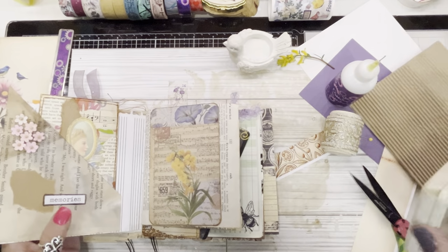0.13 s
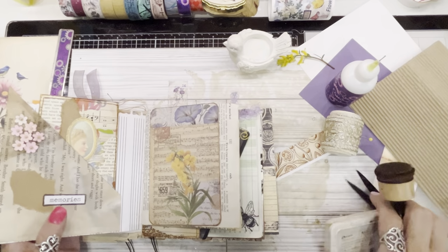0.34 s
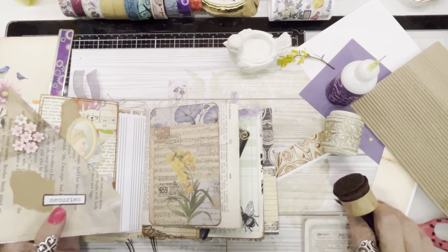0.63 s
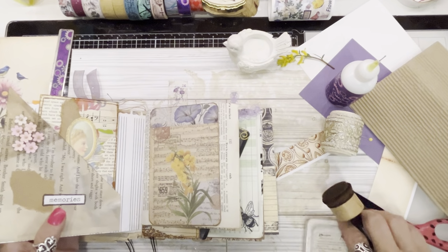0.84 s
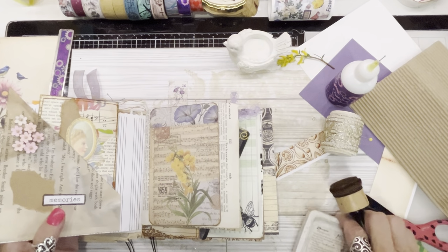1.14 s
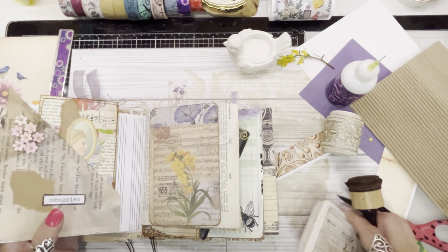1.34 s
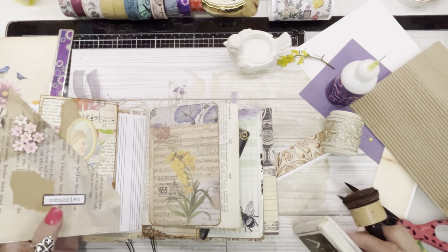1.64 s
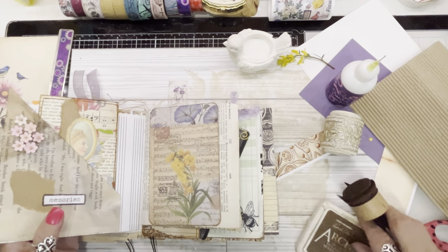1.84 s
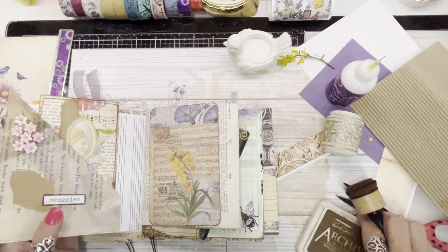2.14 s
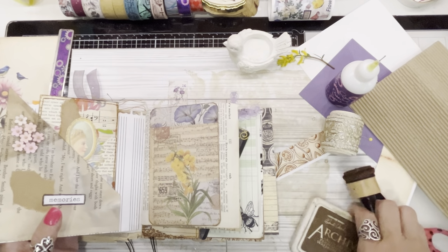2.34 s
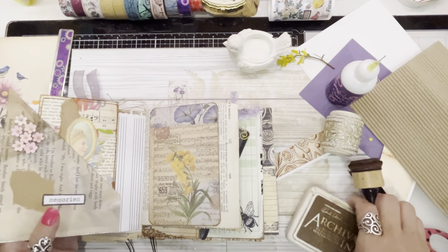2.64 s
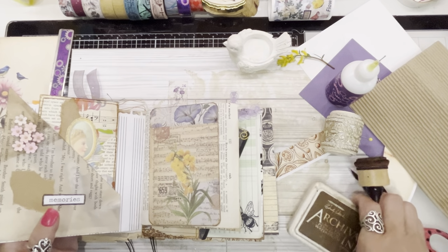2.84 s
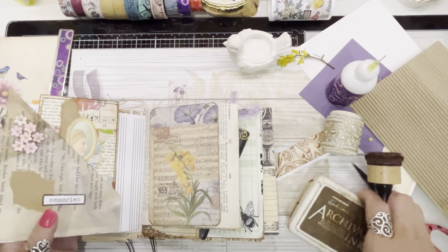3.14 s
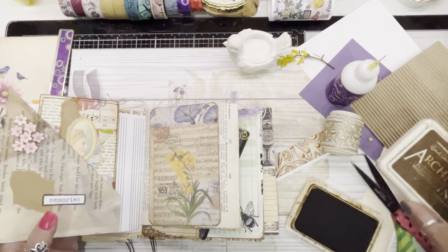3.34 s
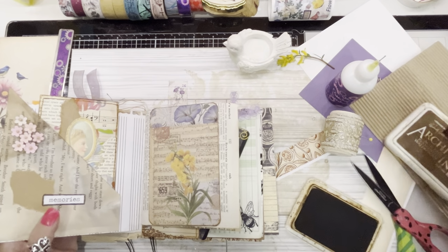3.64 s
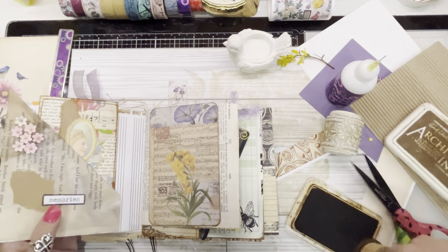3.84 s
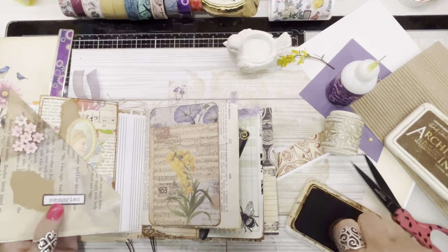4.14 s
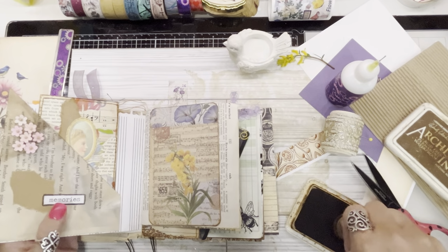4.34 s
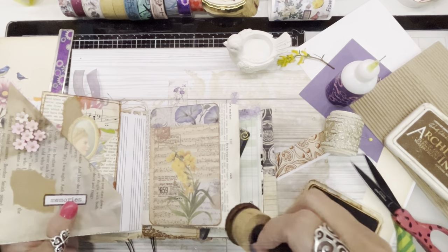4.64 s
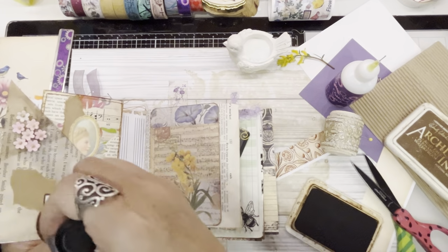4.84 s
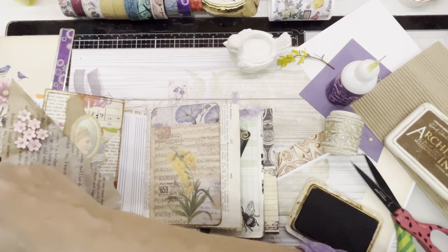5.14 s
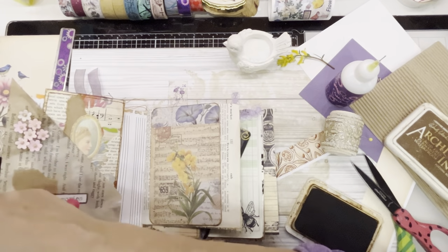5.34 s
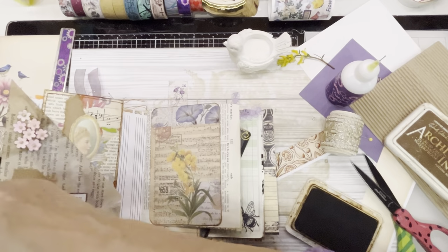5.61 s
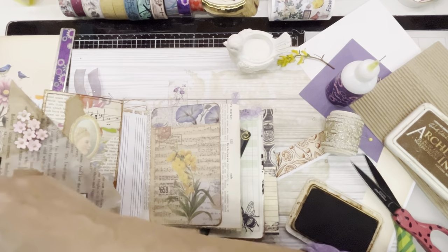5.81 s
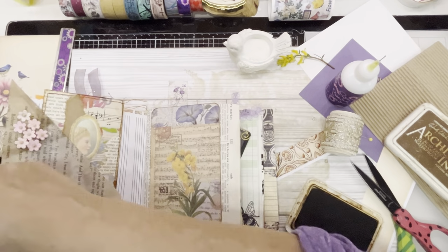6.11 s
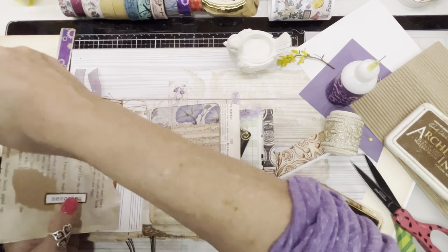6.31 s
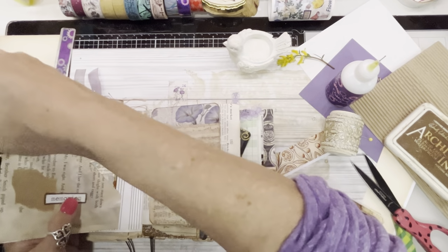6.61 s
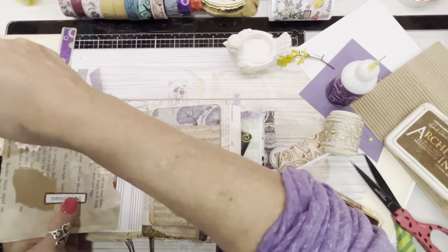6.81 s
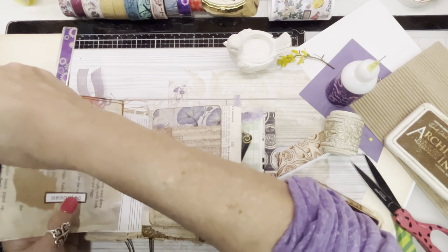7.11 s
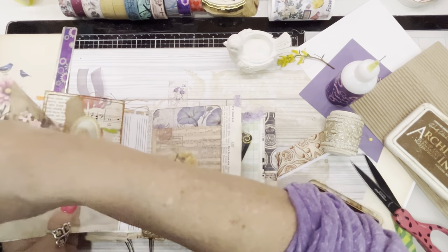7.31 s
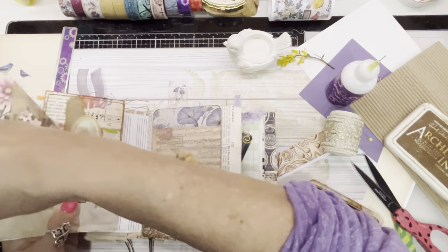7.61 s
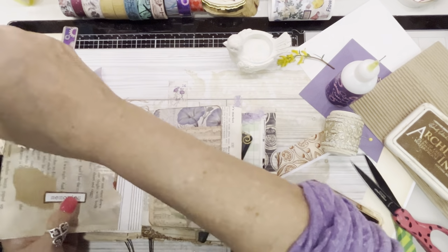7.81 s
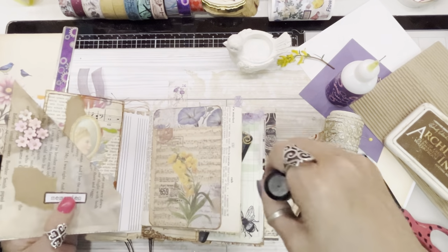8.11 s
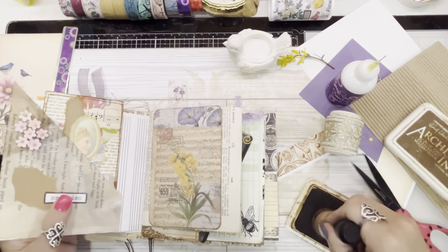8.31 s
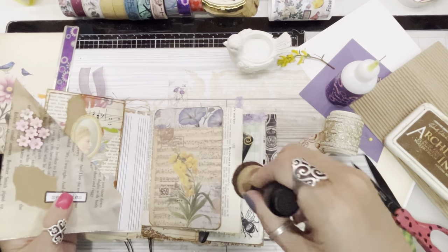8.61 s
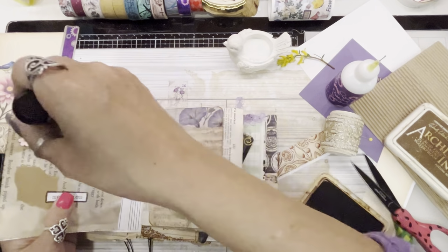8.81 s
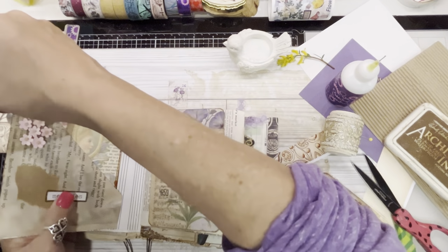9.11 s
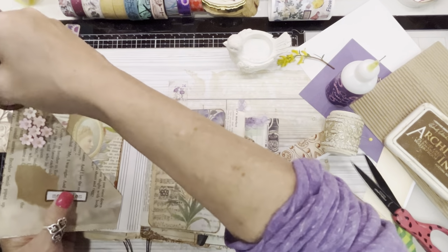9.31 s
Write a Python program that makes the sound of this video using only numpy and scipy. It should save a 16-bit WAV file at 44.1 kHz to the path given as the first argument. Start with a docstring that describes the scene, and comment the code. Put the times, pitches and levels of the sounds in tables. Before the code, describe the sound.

A plastic ink-pad case clatters on a craft desk, its lid scrapes off, then a foam tool rubs paper in short raspy strokes.

```python
"""A small room hums low throughout. First a plastic ink-pad case knocks and slides on a craft desk:
each blow is a noise burst ringing the shell and the desk, each slide is filtered hiss.
Then its lid is drawn off, a juddering scrape that sinks in pitch, and is put down with more knocks.
A foam tool is dabbed on the pad and rubbed in short hissing, rasping strokes along a sheet's edge;
it is dabbed again, squeaks as it twists off the pad, and rubs once more. A close pair of microphones."""
import sys
import numpy as np
from scipy import signal
from scipy.fft import rfft, irfft
from scipy.io import wavfile
from scipy.ndimage import map_coordinates

SR = 44100
rng = np.random.default_rng(int(sys.argv[2]) if len(sys.argv) > 2 else 0)


def put_to_file(sound):
    """Save the sound as 16-bit audio at rate SR, in the file named by the first command-line argument."""
    columns = np.atleast_2d(sound).T  # one column per channel
    safe = np.clip(columns, -1, 1)
    whole_steps = np.round(safe * 32767)
    wavfile.write(sys.argv[1], SR, whole_steps.astype(np.int16))


N = 416914
TIME = np.arange(N) / SR
BLOW = TIME[:SR // 3]   # the time that one blow lasts
HZ = np.maximum(np.arange(N // 2 + 1) * SR / N, 1)

# In all tables, levels in dB are relative: later gains set the mix. t60_s is the time to fade by 60 dB.
# the case knocking on the desk: start_s, strength_db, flatness [0 on an edge to 1 on its face],
# hardness [0-1], pitch_hz [of the low ring], desk_thud_db [extra]
KNOCKS = [(0.3024, -20.5, 0.61, 0.7, 680, -2.5), (0.331, -32, 0.64, 0, 600, -2.5),
          (0.3514, -30, 0.85, 0.7, 624, 3.5), (0.364, -22, 0.24, .6, 677, -6),
          (0.4082, -37.5, 0.29, 0, 623, 2.5), (0.4762, -13.5, 0.56, 1, 635, -2),
          (0.4924, -14, 0.6, 0.95, 592, 0), (0.508, -32, 0.53, 0.6, 650, 0),
          (0.5861, -23.5, 0.29, 0.35, 660, 4), (.599, -31, 0.88, 0, 765, -2), (.606, -30.5, 1, 0, 770, 2),
          (0.671, -43.5, 0.68, 1, 634, 2.5), (0.705, -41, 0.72, 0.72, 645, 4.5),
          (0.8786, -31, 0.54, 0.68, 690, 5), (0.8849, -21, 0.27, 0.4, 713, -3),
          (0.935, -43, 0.47, 0.1, 654, 7), (1.0056, -25, 0.26, 0.74, 700, 0.5),
          (1.018, -24, 0.41, 0.42, 678, 0), (1.032, -27.5, 0.37, 0.04, 644, 0),
          (1.0649, -30, 0.37, 0, 655, 2), (1.093, -38, 0.56, 0.08, 645, 6.5),
          (1.4484, -26.5, 0.77, 0.2, 580, -2.5), (1.4638, -35.5, 0.71, 0.2, 472, -3),
          (1.5514, -18.5, 0.82, 0.95, 654, -2), (1.5604, -27.5, .95, 0.6, 647, -6),
          (1.5887, -22.5, 0.79, 0.54, 627, 4), (1.596, -26, 0.95, 0, 443, 4),
          (1.608, -19.5, 0.79, 0.5, 582, 4), (1.6143, -23.5, 0.78, 0, 594, 3),
          (1.6534, -35.5, 1, 1, 636, -0.5), (1.7117, -32, 0.63, 0, 652, 1),
          (1.7895, -35.5, 0.41, .55, 600, 5), (1.8, -31.5, 0.27, 0.9, 610, -1.5),
          (1.8088, -12.5, 0.38, 0.84, 690, -1.5), (1.835, -27, 0.081, 0.84, 645, 2.5),
          (1.871, -17.5, 0.56, 0.94, 608, 0), (1.9817, -46, 0.46, 0.97, 606, 2),
          (2.1076, -38.5, 0.88, 1, 656, 7), (2.135, -42.5, 0.8, 1, 650, 4.5),
          (2.2153, -32, 0.28, 0.27, 670, -4), (2.2688, -22, 0.18, 0.21, 655, 0.5),
          (2.377, -43.5, 0.73, 0.6, 646, 4), (2.392, -46.5, 0.58, 0.1, 617, -1),
          (2.57, -43.5, 0.67, 0.1, 633, -7), (2.993, -43.5, 0.44, 0.2, 604, -3),
          (3.0909, -43, 0.55, 0, 707, -1.5)]
# low ring of the case lying on the desk: multiple_of_pitch, level_db, t60_s
RING = [(.47, -11, 0.015), (.7, -5, 0.031), (.9, -9.5, 0.033), (.99, 6.5, 0.044), (1.069, -5, 0.052),
        (1.189, -8, .05)]
# resonances of the plastic shell: pitch_hz, width_hz, level_db
SHELL = [(655, 20, 13), (860, 360, 2), (1016, 49, 6.5), (1267, 130, 1), (1800, 150, -11.5), (1840, 53, -11),
         (2497, 190, -2.5), (2930, 65, -4.5), (3030, 130, -6.5), (3337, 150, -6.5), (3660, 65, -6),
         (4040, 160, -7), (4460, 160, -3), (5160, 200, 3.5)]
# resonances of the hollow lid: pitch_hz, width_hz, level_db
LID_MODES = [(633, 52, 2), (1350, 135, 5), (1854, 45, -8.5), (2440, 57, -4.5), (2730, 120, -8.5),
             (3580, 160, 0), (3735, 130, 2), (4460, 120, -11), (5450, 170, -2), (7900, 100, -5)]
# colour of the case scraping the desk: pitch_hz, level_db [per Hz]
SLIDE_COLOUR = [(200, -5.5), (400, -9.5), (650, -2.5), (1000, -5.5), (1500, -8), (2800, -7.5), (3900, -4.5),
                (5500, -6.5), (7500, -14.5), (10000, -27.5), (15500, -28)]


def from_db(db):
    """Turns decibels into a gain."""
    return 10 ** (np.asarray(db) / 20)


def rms_one(x):
    """Scales a sound to an average strength (rms) of 1."""
    return x / np.sqrt(np.mean(x ** 2) + 1e-20)


def over_hz(points):
    """Reads a table of (Hz, value) at every frequency, in even steps of pitch."""
    hz, value = np.transpose(points)
    return np.interp(np.log(HZ), np.log(np.maximum(hz, 1)), value)


def level(rows):
    """Turns a table of (s, dB) into a gain in time, silent outside it."""
    s, db = np.transpose(rows)
    return from_db(np.interp(TIME, s, db, left=-200, right=-200))


def band(x, low_hz, high_hz, order=2):
    """Keeps only the frequencies between two limits."""
    limits = [low_hz, min(high_hz, .45 * SR)]
    return signal.sosfilt(signal.butter(order, limits, "band", fs=SR, output="sos"), x + 1e-18)


def coloured(x, spectrum):
    """Shapes the spectrum by a table of (Hz, dB); rms 1."""
    return rms_one(irfft(rfft(x) * from_db(over_hz(spectrum)), N))


def drift(rate_hz):
    """Slow random wandering, rms 1: low-passed noise on a coarse grid."""
    coarse = np.arange(0, N + 32, 32)
    hz = np.fft.rfftfreq(len(coarse), coarse[1] / SR)
    spectrum = rfft(rng.standard_normal(len(coarse))) / (1 + (hz / rate_hz) ** 4)
    slow = irfft(spectrum, len(coarse))
    return np.interp(np.arange(N), coarse, rms_one(slow))


def resonate(x, modes):
    """Rings side-by-side resonances of (Hz, width Hz, dB), with alternating signs."""
    out = 0
    for k, (hz, width, db) in enumerate(modes):
        r = np.exp(-np.pi * width / SR)
        feed = np.array([1, 0, -1]) * (1 - r * r) / 2
        feedback = [1, -2 * r * np.cos(2 * np.pi * hz / SR), r * r]
        out = out + (-1) ** k * from_db(db) * signal.lfilter(feed, feedback, x)
    return out


def width_from_t60(t60):
    """A resonance that fades slowly is narrow: its width in Hz."""
    return np.log(1000) / np.pi / t60


def dying(t60, rise_s, delay_s=0):
    """Envelope of one blow: a quick rise, then an exponential fade."""
    t = np.maximum(BLOW - delay_s, 0)
    return (1 - np.exp(-t / rise_s)) * np.exp(-np.log(1000) * t / t60)


def at_level(x, db):
    """Scales a blow so that its energy, spread over 10 ms, has this level."""
    energy = np.sum(x ** 2, axis=-1, keepdims=True)
    return from_db(db) * x / np.sqrt(energy / (SR / 100) + 1e-20)


def place_blow(out, blow, s):
    """Adds one blow to the track at its start time."""
    start = int(s * SR)
    out[:, start:start + len(BLOW)] += blow


def gestures(rows, attack_s, release_s):
    """Gain of hand movements: each speeds up, swells or sags steadily, and slows to a stop."""
    out = np.zeros(N)
    for s, length, db, swell_db in rows:
        t = np.clip(TIME - s, 0, length)
        speed = np.minimum(t / attack_s, 1) * np.minimum((length - t) / release_s, 1)
        out += speed * from_db(db + swell_db * (t / length - .5))
    return np.maximum(out, 0)


def friction(grains_per_s, grain_share, flutter_db, flutter_hz):
    """Countless tiny slips: a smooth hiss with coarser grains, fluttering with the pressure of the hand."""
    slips = (rng.random((2, N)) < grains_per_s / SR) * rng.standard_normal((2, N))
    rub = rng.standard_normal((2, N)) + grain_share * rms_one(slips)
    return rub * from_db(flutter_db * drift(flutter_hz))


def stick_slip(per_s, uneven, hold, spread_db):
    """Gain of a rub that goes in uneven jerks, each dying before the next; rms 1."""
    phase = np.cumsum(per_s * np.exp(uneven * drift(per_s))) / SR
    return rms_one(np.exp(-(phase % 1) / hold) * from_db(spread_db * drift(per_s)))


def snags(per_s, spread_db):
    """Now and then a fibre catches and lets go: lone clicks of very uneven size; rms 1."""
    sizes = from_db(spread_db * np.minimum(rng.exponential(1, N), 3))
    return rms_one((rng.random(N) < per_s / SR) * sizes * rng.standard_normal((2, N)))


def gliding(hz, width_hz):
    """Noise in one resonance whose centre moves."""
    phase = 2 * np.pi * np.cumsum(hz) / SR
    return (drift(width_hz) * np.sin(phase) + drift(width_hz) * np.cos(phase)) * [[1], [0]]


def wandering(x, share, rate_hz):
    """The hand flexes the object, so all its resonances waver together: playback speed varies."""
    place = np.cumsum(1 + share * drift(rate_hz))
    return np.array([map_coordinates(row, [place], order=3, mode="nearest") for row in x])


def shifting(x, patchy_db, rate_hz):
    """The contact moves over the surface, so each octave swells and fades on its own; rms 1."""
    edges = 450 * 2 ** np.arange(7)
    octaves = zip(edges, edges[1:])
    return rms_one(sum(band(x, low, high) * from_db(patchy_db * drift(rate_hz)) for low, high in octaves))


def case_sings(x):
    """Steady rubbing keeps the low ring of the case going; rms 1."""
    resting_hz = 660
    return rms_one(resonate(x, [(resting_hz * ratio, width_from_t60(t60), db) for ratio, db, t60 in RING]))


def chatter(t60, rattles_per_s, rattle_db, rattle_t60, rise_s):
    """One contact: a short crunch, then smaller and smaller touches as the object settles."""
    touches = (rng.random(len(BLOW)) < rattles_per_s / SR) * rng.random(len(BLOW))
    touches = touches * dying(rattle_t60, 0.0049)
    settling = signal.fftconvolve(touches, dying(t60 / 2, rise_s))[:len(BLOW)]
    return rng.standard_normal((2, len(BLOW))) * (dying(t60, rise_s) + from_db(rattle_db) * settling)


def contact_rules(strength_db, flatness, hardness):
    """A flat landing rings, an edge clacks, a hard contact ticks: ring dB, clack Hz, clack dB, tick dB."""
    flat_swing_db = 46   # from edge to face, the low ring gains this much on the clack
    soft_tick_db = -44   # the softest contact loses this much of the tick
    ring_over_clack = flat_swing_db * (flatness - .5)
    ring_db = strength_db + min(ring_over_clack, 0)
    clack_db = strength_db - max(ring_over_clack, 0)
    # hardness raises the centre of the clack, flatness lowers it (in octaves)
    clack_hz = 1900 * 2 ** (0.93 * hardness - 1.1 * flatness)
    return ring_db, clack_hz, clack_db, clack_db + soft_tick_db * (1 - hardness)


def rim_tick(t60):
    """The rim crunches briefly and brightly."""
    # bright tick of the rim: pitch_hz, width_hz, level_db
    tick_modes = [(5150, 1300, 10.5), (6100, 350, 1), (6760, 450, 4), (7920, 430, -15.5),
                  (10860, 2700, -6.5), (11870, 2800, -6.5), (14500, 710, -12)]
    touch = chatter(t60, rattles_per_s=90, rattle_db=-14.5, rattle_t60=0.092, rise_s=0.00048)
    return resonate(touch, tick_modes)


def desk_thud(desk_top_hz, travel_s, desk_damping):
    """The desk top booms after the blow: bending waves arrive late, the lowest last."""
    # desk top: pitch_hz, level_db, t60_s [before desk_damping divides it]
    desk_modes = [(51.5, -9, 0.05), (73.3, 2, 0.32), (96, 5, 0.23), (163.6, 1, 0.22), (200, 3.5, 0.17),
                  (270, 2.5, 0.09), (383, 1.5, 0.039)]
    boom = 0
    for hz, db, t60 in desk_modes:
        late = travel_s * np.sqrt(desk_modes[0][0] / hz)
        strength = from_db(db + rng.normal(0, 0.86)) / (1 + (hz / desk_top_hz) ** 4)
        wave = np.sin(2 * np.pi * hz * (1 + rng.normal(0, 0.054)) * (BLOW - late))
        boom = boom + strength * dying(t60 / desk_damping, 0.0087, late) * wave
    return band(boom, 45, 980)


def blows(table, shell_modes, puff_db, ring_db, clack_db, tick_db, thud_db, thud_follows, ring_rise_s,
          clack_t60, tick_t60, clack_width, desk_top_hz, travel_s, crack, desk_damping):
    """Each contact gives a tick, a clack of the shell, a low ring, a dull puff and a late thud of the desk."""
    mode_scatter_db = 3
    out = np.zeros((2, N + len(BLOW)))
    for s, strength_db, flatness, hardness, pitch, weight_db in table:
        ring, centre, clack, tick = contact_rules(strength_db, flatness, hardness)
        blow = at_level(rim_tick(tick_t60), tick + tick_db)
        contact = chatter(clack_t60, rattles_per_s=530, rattle_db=-12.5, rattle_t60=0.095, rise_s=0.00046)
        # the place of contact and the grip change how each mode answers
        modes = [(hz * (1 + rng.normal(0, 0.005)), width, db + rng.normal(0, mode_scatter_db))
                 for hz, width, db in shell_modes]
        rung = resonate(contact, modes) + crack * contact
        shell = band(rung, centre / clack_width, centre * clack_width)
        blow += at_level(shell, clack + clack_db)
        low = 0
        for ratio, db, t60 in RING:
            tone = np.sin(2 * np.pi * pitch * ratio * (BLOW - .002))
            low = low + from_db(db + rng.normal(0, 0.88)) * dying(t60, ring_rise_s) * tone
        blow[0] += at_level(low, ring + ring_db)
        # air and loose paper are squeezed under the blow
        puff = band(rng.standard_normal(len(BLOW)) * dying(t60=0.089, rise_s=0.0034), 205, 860)
        blow[0] += at_level(puff, (strength_db + ring) / 2 + puff_db)
        thud = desk_thud(desk_top_hz, travel_s, desk_damping)
        blow[0] += at_level(thud, thud_db + weight_db + thud_follows * strength_db)
        place_blow(out, blow, s)
    return out[:, :N]


def room_tone():
    """Moving air as coloured noise, and the hum of appliances as wavering tones."""
    # room air: pitch_hz, level_db [per Hz]
    air_colour = [(20, -23.5), (35, -20.5), (55, -1.5), (90, -0.5), (145, -12), (260, -18.5), (450, -15.5),
                  (700, -22), (1500, -26), (4000, -32), (5500, -37), (8000, -50), (12000, -57),
                  (16000, -54)]
    # hum: pitch_hz, level_db, wavering_share [0-1]
    hum_tones = [(70, -57, 0.99), (101.6, -64, 1), (117.5, -54, .92), (163.5, -73.5, 1), (349, -74, 1)]
    air = from_db(-58.5) * coloured(rng.standard_normal((2, N)), air_colour)
    for hz, db, waver in hum_tones:
        phase = 2 * np.pi * hz * TIME
        steady = np.sqrt(2 * (1 - waver ** 2))
        in_step = (steady + waver * drift(rate_hz=5.3)) * np.sin(phase)
        air[0] += from_db(db - 3.0) * (in_step + waver * drift(rate_hz=2.5) * np.cos(phase))
    return air


def room(x, wet_db, treble_t60):
    """The walls' echoes blur into a diffuse tail of fading noise, its treble dying sooner."""
    room_t60_s = 0.26
    t = TIME[:SR // 2]
    noise = rng.standard_normal((2, len(t))) * (1 - np.exp(-t / 0.0022))
    tail = band(noise, 140, 3600) * from_db(-60 * t / room_t60_s)
    tail += 0.6 * band(noise[::-1], 4200, 13000) * from_db(-60 * t / treble_t60)
    tail /= np.sqrt(np.sum(tail ** 2) / 2)
    return from_db(wet_db) * signal.fftconvolve(x, tail, axes=1)[:, :N]


def microphones(x, likeness):
    """The first row is what both microphones share, the second what sets them apart."""
    # how far the left leads: pitch_hz, lead_radians
    lead = [(100, 0), (450, -.8), (900, -2), (1700, .4), (2600, -2.3), (3700, -.9), (4900, -3.1),
            (6100, -2.9), (7600, -.3), (8800, 1.5), (10000, 3.1), (12500, 6.3), (15000, 9.4)]
    # left louder than right: pitch_hz, difference_db
    tilt = [(60, 0), (120, 2), (240, 1.5), (480, 2.5), (950, 4), (1890, 0), (3770, -1.5), (7520, 0.5),
            (15000, -0.5)]
    alike = over_hz(likeness)
    shared, apart = rfft(x)
    sides = np.array([[1], [-1]])
    pair = (np.sqrt(1 + alike) * shared + sides * np.sqrt(1 - alike) * apart) / np.sqrt(2)
    pair = pair * from_db(sides * over_hz(tilt) / 2) * np.exp(.5j * sides * over_hz(lead))
    return irfft(pair, N)


def tool_taps():
    """Small ticks of the tool in the hand: short crunches ring it."""
    # ticks: start_s, level_db
    taps = [(5.445, -67), (6.199, -55), (7.267, -58), (7.5375, -61), (7.575, -54), (8.865, -53.5)]
    # resonances of the tool: pitch_hz, width_hz, level_db
    tool_modes = [(1420, 280, -15), (2140, 340, 9), (3200, 390, 3.5)]
    out = np.zeros((2, N + len(BLOW)))
    for s, db in taps:
        crunch = rng.standard_normal((2, len(BLOW))) * dying(0.022, 0.0003)
        place_blow(out, at_level(resonate(crunch, tool_modes), db), s)
    return out[:, :N]


def clicks():
    """Loose lid and base click together in handling: a short crunch rings one spot of the rim."""
    # clicks: start_s, level_db, pitch_hz, t60_s
    click_rows = [(0.3128, -35.5, 5330, .02), (0.349, -45, 5800, .012), (0.389, -49.5, 7340, .012),
                  (0.4666, -38, 4800, .012), (0.4944, -25.5, 1051, 0.043), (0.494, -28, 5550, .02),
                  (0.607, -36, 1070, 0.073), (0.889, -30.5, 2550, .03), (0.914, -46, 2220, .03),
                  (1.0069, -29.5, 1120, .03), (1.026, -32.5, 2400, .03), (1.0657, -45, 2380, .03),
                  (1.447, -44, 1960, .015), (1.5892, -36.5, 1400, .03), (1.605, -45, 4350, .012),
                  (1.6147, -39, 4200, .014), (1.715, -43, 1360, .035), (1.783, -45.5, 3000, .015),
                  (1.8365, -27, 3660, .014), (1.873, -24.5, 3870, .016), (2.2705, -43.5, 1520, .02),
                  (2.2868, -44, 1680, .025), (3.4706, -46, 3000, .008), (3.479, -44, 12700, .008),
                  (3.4926, -31, 4320, .008), (3.5066, -30.5, 3300, .008)]
    crack_share = .25   # share of the dry contact that is heard beside the ring
    out = np.zeros((2, N + len(BLOW)))
    for s, db, hz, t60 in click_rows:
        contact = rng.standard_normal((2, len(BLOW))) * dying(t60=0.018, rise_s=0.00048)
        ring = at_level(resonate(contact, [(hz, width_from_t60(t60), 0)]), db)
        crack = at_level(band(contact, hz / 1.6, hz * 1.6), db)
        place_blow(out, ring + crack_share * crack, s)
    return out[:, :N]


def scuffing_case():
    """After each knock the case scuffs on the desk and in the fingers: a fading friction hiss."""
    scuff_db, onset_s, tail_s = -24, 0.0056, 0.03   # relative to the knock; short soft onset, then fade
    rub = friction(grains_per_s=820, grain_share=0.6, flutter_db=3.0, flutter_hz=70)
    scuff = np.zeros(N)
    for s, db, *_ in KNOCKS:
        near = slice(max(int((s - .1) * SR), 0), int((s + .5) * SR))
        t = TIME[near] - s
        envelope = np.exp(np.minimum(t / onset_s, -t / tail_s))
        scuff[near] = np.maximum(scuff[near], from_db(db + scuff_db) * envelope)
    return scuff * (from_db(3.0) * coloured(rub, SLIDE_COLOUR) + from_db(1.5) * case_sings(rub))


def sliding_case():
    """The case scrapes along, rings faintly and groans once; the desk rumbles under it."""
    # the case pushed over the desk: start_s, length_s, level_db, swell_db [from start to end]
    pushes = [(2.175, .06, -51.5, 5), (2.29, 0.15, -53.5, 0), (2.45, 0.094, -50, -2),
              (2.55, 0.37, -77, -29), (2.8, 0.29, -60.5, -10), (2.945, 0.089, -43.5, -10),
              (3.03, 0.12, -60.5, -4)]
    # the desk rumbling under the longest shove: start_s, length_s, level_db, swell_db [from start to end]
    rumble_rows = [(2.3, .55, -49.5, 0)]
    # the case sticks and slips in a brief groan: time_s, slips_per_s [before a slight wavering], level_db
    groan_path = [(2.9, 173, -64), (2.924, 300, -52), (2.94, 318, -52), (2.965, 210, -77)]
    ring_limit_db = -51   # the gain of the low ring stops here, however loud the scrape
    scrape = friction(grains_per_s=330, grain_share=0.81, flutter_db=1.5, flutter_hz=45.2)
    rumble = gestures(rumble_rows, attack_s=.08, release_s=.16) * rms_one(band(scrape, 38, 90))
    s, slips_per_s, db = np.transpose(groan_path)
    slip_rate = np.interp(TIME, s, slips_per_s) * (1 + 0.022 * drift(80))
    phase = 2 * np.pi * np.cumsum(slip_rate) / SR
    groan = level(np.transpose([s, db])) * (np.sin(phase) + 0.63 * np.sin(2 * phase)) * [[1], [0]]
    push = gestures(pushes, attack_s=0.02, release_s=0.048)
    ring = np.minimum(push, from_db(ring_limit_db)) * case_sings(scrape)
    shell = rms_one(resonate(scrape, SHELL))
    slide = push * (from_db(-2.0) * coloured(scrape, SLIDE_COLOUR) + from_db(-13) * shell)
    return slide + from_db(-2) * ring + from_db(-4.0) * rumble + from_db(7.0) * groan


def sliding_lid():
    """The rim catches, then judders along the base; the hollow lid sings and its air space sinks in pitch."""
    # the lid drawn off: time_s, level_db
    lid_path = [(3.138, -53.5), (3.16, -42), (3.19, -40), (3.25, -43), (3.3, -49), (3.36, -59),
                (3.44, -73.5)]
    # its rim catching as it comes free: start_s, length_s, level_db, swell_db [from start to end]
    catch_rows = [(3.139, 0.012, -41.5, -5)]
    # colour of the sliding lid: pitch_hz, level_db [per Hz]
    lid_colour = [(200, 10.5), (450, 1.5), (650, -14), (1000, 2.5), (1400, 9), (2200, 0), (3300, 9.5),
                  (4300, -3), (6000, -5.5), (8000, -11), (9500, -32), (12500, -7.5), (16000, -37)]
    # the air space under the lid grows as it lifts, so its resonance falls
    start_hz, end_hz, fall_s, cavity_width_hz = 1670, 1187, 0.12, 45
    open_s = .04   # the treble of the scrape escapes only once the gap has opened
    jerks = stick_slip(per_s=190, uneven=.45, hold=.6, spread_db=2.5)
    scrape = friction(grains_per_s=2500, grain_share=1.0, flutter_db=-0.5, flutter_hz=60) * jerks
    hollow = rms_one(wandering(resonate(scrape, LID_MODES), share=0.01, rate_hz=14))
    rumble = rms_one(band(scrape, 60, 130))
    since = np.maximum(TIME - lid_path[0][0], 0)
    cavity_hz = end_hz + (start_hz - end_hz) * np.exp(-since / fall_s)
    overtone = gliding(4.7 * cavity_hz, width_hz=160)
    cavity = jerks * (gliding(cavity_hz, cavity_width_hz) + from_db(-15) * overtone)
    catch = gestures(catch_rows, attack_s=0.003, release_s=.006) * rms_one(band(scrape, 1200, 1800))
    rub = from_db(-2.0) * coloured(scrape, lid_colour) + from_db(3) * hollow + from_db(-5.5) * cavity
    shut = 1 - np.minimum(since / open_s, 1) ** 2
    escaping = (1 - shut) * rub + shut * band(rub, 100, 4000)
    return catch + level(lid_path) * (escaping + from_db(-7) * rumble)


def lid_put_down():
    """The hollow lid knocks on the desk as it is put down."""
    # start_s, strength_db, flatness [0-1], hardness [0-1], pitch_hz [of the low ring], desk_thud_db [extra]
    lid_knocks = [(3.4793, -28, 0.4, 0.66, 650, 0), (3.4924, -22.5, 0.57, 0.76, 660, 0.0053),
                  (3.505, -27, 0.53, 0.75, 673, 0), (3.518, -44, 0.59, 0.39, 643, 0),
                  (3.5698, -37.5, 0.63, 0.14, 680, 0), (3.5992, -43, 0.64, 0.42, 660, 0)]
    return blows(lid_knocks, LID_MODES, puff_db=-5, ring_db=-2.5, clack_db=2.0, tick_db=7.5,
                 thud_db=-17.0, thud_follows=0.89, ring_rise_s=0.00036, clack_t60=0.044, tick_t60=0.016,
                 clack_width=2.46, desk_top_hz=596.5, travel_s=0.0118, crack=0.66, desk_damping=0.75)


def dabbing_tool():
    """The foam tool lands on the pad, sometimes rim first, and rings its base."""
    # start_s, strength_db, flatness [0-1], hardness [0-1], pitch_hz [of the low ring], desk_thud_db [extra]
    dabs = [(4.0365, -41, 0.44, 0.21, 636, 8.5), (4.0395, -36.5, 0.87, 0.34, 545, -7),
            (4.2968, -34, 0.26, 0.28, 642, -14), (4.2985, -29.5, 0.8, 0.61, 610, 2.5),
            (8.3148, -30.5, 0.95, 0.086, 575, 2.5)]
    # open base of the pad, damped by the foam: pitch_hz, width_hz, level_db
    pad_modes = [(400, 99, 17), (740, 72, -2), (1005, 63, -3), (1310, 55, 8.5), (1650, 190, 2.5),
                 (2620, 540, 1.5), (3430, 350, -7.5)]
    return blows(dabs, pad_modes, puff_db=-8, ring_db=1.0, clack_db=-3.5, tick_db=5,
                 thud_db=17.0, thud_follows=1.45, ring_rise_s=0.00075, clack_t60=0.022, tick_t60=0.031,
                 clack_width=1.96, desk_top_hz=119.1, travel_s=0.012, crack=0.19, desk_damping=2.45)


def twisting_foam():
    """The foam squeaks off the pad in small jerks: the bands of the base sink, and its low ring follows."""
    # foam twisting off the pad, once: start_s, length_s, level_db, swell_db [from start to end]
    twist = [(8.446, 0.082, -50.5, -16)]
    # colour of the twisting foam: pitch_hz, level_db [per Hz]
    twist_colour = [(290, -33), (500, -21), (750, -10), (2680, -12), (4500, -17), (5380, -20),
                    (8370, -21.5), (10100, -30), (13200, -26), (15000, -59)]
    # base of the pad under the foam: pitch_hz [halfway through the twist], width_hz, level_db
    base_modes = [(1060, 46, 2), (1460, 77, -7), (1730, 65, 1.5), (2600, 60, 5.5), (3100, 60, -6),
                  (3920, 63, -15), (4680, 70, 3), (5850, 90, -6)]
    sag_per_s = .7   # the bands sink as the pressure eases: share of their pitch
    ring_hz, ring_width_hz, ring_late_s = 686, 27, 0.025   # the low ring of the base builds up late
    rub = friction(grains_per_s=340, grain_share=0.42, flutter_db=-0.5, flutter_hz=60.2)
    rub = rub * stick_slip(per_s=320, uneven=.3, hold=.9, spread_db=-1.0)
    s, length = twist[0][:2]
    sag = 1 - sag_per_s * np.clip(TIME - s - length / 2, -length, length)
    squeak = rms_one(sum(from_db(db + 3.3 * drift(25)) * gliding(hz * sag, width)
                         for hz, width, db in base_modes))
    ring = rms_one(resonate(rub, [(ring_hz, ring_width_hz, 0)]))
    late_rows = [(start + ring_late_s, *rest) for start, *rest in twist]
    late = gestures(late_rows, attack_s=0.01, release_s=0.028)
    squelch = from_db(-4) * coloured(rub, twist_colour) + from_db(-2) * squeak
    return gestures(twist, attack_s=0.016, release_s=0.02) * squelch + from_db(-5) * late * ring


def foam():
    """The foam brushes over the paper: its fibres hiss, the sheet's edge rasps and snags."""
    # strokes: start_s, length_s, hiss_db, swell_db [from start to end], rasp_db [of the sheet's edge]
    stroke_rows = [(5.219, .13, -50.5, 13, -56), (5.348, 0.063, -45, -16, -55.5),
                   (5.439, 0.13, -47, -13, -56.5), (5.846, 0.068, -54, -12, -57.5),
                   (6.064, 0.2, -51.5, -12, -56), (6.193, 0.26, -46, -5, -58),
                   (6.54, .087, -68, -14, -66.5), (6.72, 0.13, -44.5, -5, -55.5),
                   (6.85, .18, -47.5, -6, -58), (7.053, .12, -43.5, -8, -54), (7.163, 0.17, -48, 12.5, -55),
                   (7.352, .13, -43.5, -1, -52.5), (7.478, .15, -46.5, 5, -54),
                   (7.621, 0.15, -44, 4.5, -54), (9.03, 0.076, -57, -1.5, -59.5),
                   (9.134, .11, -43.5, -5, -56.5), (9.245, 0.13, -48.5, 5, -59),
                   (9.367, .11, -43, -14, -59.5)]
    # colour of the foam on paper: pitch_hz, level_db [per Hz]
    paper_colour = [(300, -10), (700, -1), (1000, 7.5), (1700, 5.5), (2500, 4), (3700, 6), (4500, 0.5),
                    (5300, 5), (6600, 9), (8200, 5.5), (9800, -7.5), (12500, -6), (14000, 5), (15500, -24)]
    # resonances of the free edge of the sheet: pitch_hz [before the judder bends it], width_hz, level_db
    sheet_modes = [(970, 170, -4), (1610, 98, 6), (2630, 150, 8.5), (3800, 290, 0)]
    rasp_follows = 0.74   # the edge rasps even when the hand is slow: share of the hiss's swell in dB
    brush = friction(grains_per_s=1200, grain_share=0.44, flutter_db=0.6, flutter_hz=51.5)
    catching = friction(grains_per_s=430, grain_share=0.64, flutter_db=1.0, flutter_hz=60)
    # the hand speeds up, and slows for the turn
    strokes = gestures([row[:4] for row in stroke_rows], attack_s=0.048, release_s=0.05)
    bite_rows = [(s, length, rasp_db, rasp_follows * swell_db)
                 for s, length, _, swell_db, rasp_db in stroke_rows]
    bite = gestures(bite_rows, attack_s=0.016, release_s=0.028)
    fibres = coloured(shifting(brush, patchy_db=2.3, rate_hz=10.4), paper_colour)
    hiss = strokes * rms_one(band(fibres, 3550, 24000, order=4))
    edge = catching + 0.3 * snags(per_s=90, spread_db=5.0)   # fibres catch on the sheet's edge
    jerks = stick_slip(per_s=110, uneven=.5, hold=.6, spread_db=2.5)
    # the sheet judders and bends under the tool, so its resonances slide about within each stroke
    sheet = rms_one(wandering(resonate(edge * jerks, sheet_modes), share=.07, rate_hz=9))
    scratch = rms_one(band(coloured(edge, paper_colour), 400, 5640, order=4))
    rasp = bite * (from_db(-2.5) * scratch + from_db(-7.0) * sheet)
    return from_db(-6.5) * hiss + rasp


def knocking_case():
    """The plastic case is tipped and tumbled: its shell knocks on the desk."""
    return blows(KNOCKS, SHELL, puff_db=-11.5, ring_db=1.5, clack_db=0.0, tick_db=-2.5,
                 thud_db=-19.0, thud_follows=0.56, ring_rise_s=0.0042, clack_t60=0.025, tick_t60=.03,
                 clack_width=1.7, desk_top_hz=397, travel_s=.013, crack=0.21, desk_damping=1.9)


def scene():
    """Everything happens on the desk, close under the microphones, in a small dry room."""
    # how alike left and right are, for the desk and for the room air: pitch_hz, likeness [0-1]
    desk_likeness = [(100, 1), (600, 0.11), (1200, 0.089), (2500, 0.25), (4000, 0.21), (5200, 0.99),
                     (7200, 0.37), (10000, .93), (15000, 0.52)]
    air_likeness = [(100, 0.88), (300, 0.78), (700, 0.055), (2000, 0.033), (4000, 0.17), (6200, 0.8),
                    (8000, 0.8), (12000, 1)]
    case = knocking_case() + clicks() + scuffing_case() + sliding_case()
    lid = sliding_lid() + lid_put_down()
    tool = dabbing_tool() + tool_taps() + twisting_foam() + foam()
    direct = microphones(case + lid + tool, desk_likeness)
    background = microphones(room_tone() * from_db(3.5), air_likeness)
    return direct + room(direct, wet_db=-23.0, treble_t60=0.17) + background


def record(dry):
    """The deepest bass is rolled off, the highest peaks are rounded and the top is cut steeply."""
    cutoff_hz = 15900
    lean = signal.sosfilt(signal.butter(2, 30, "high", fs=SR, output="sos"), dry)
    rounded = 1.1 * np.tanh(lean / 1.1)
    return signal.sosfilt(signal.ellip(10, .2, 80, cutoff_hz, fs=SR, output="sos"), rounded)


dry = scene()
out = record(dry)
put_to_file(out)
```